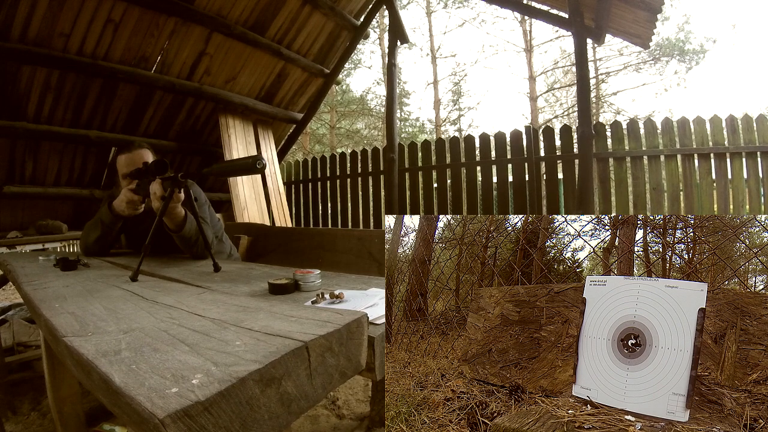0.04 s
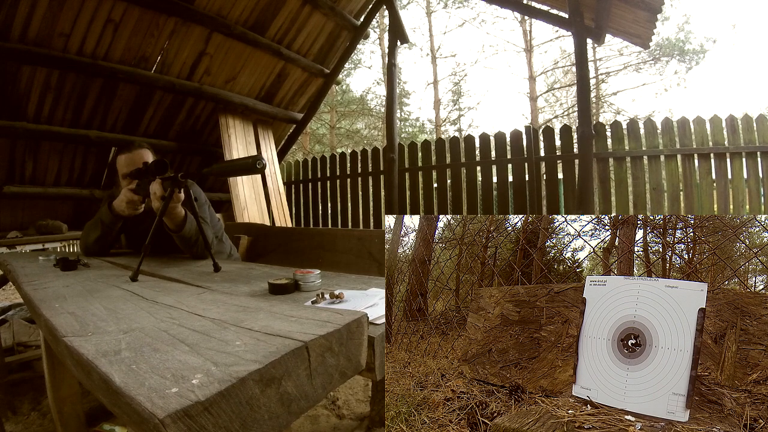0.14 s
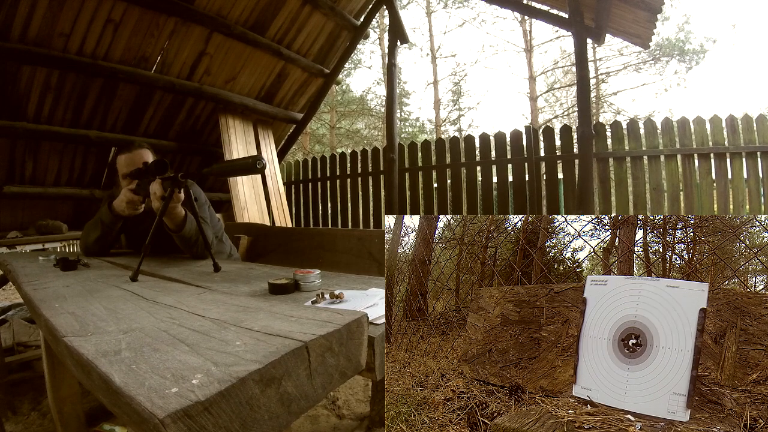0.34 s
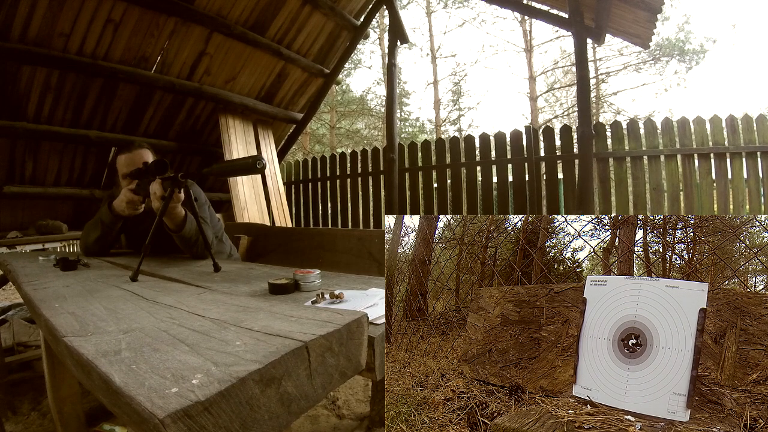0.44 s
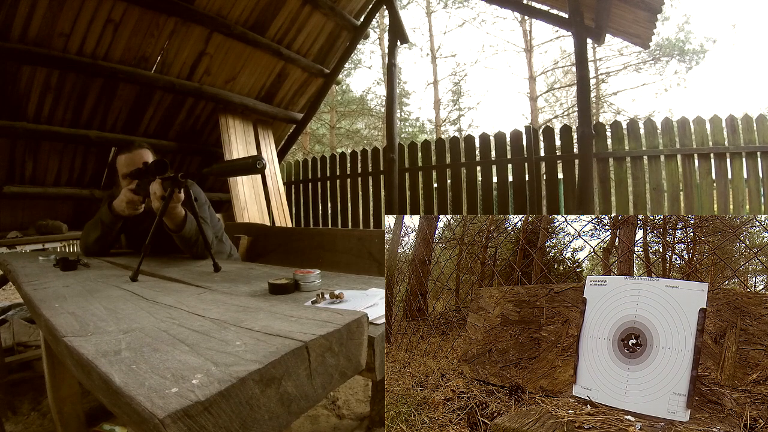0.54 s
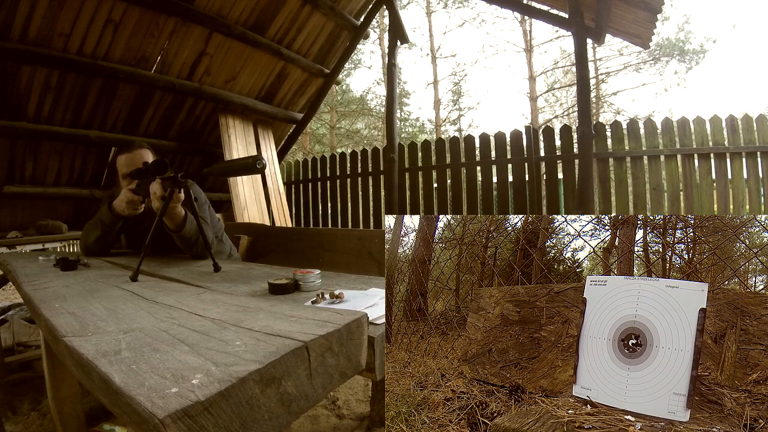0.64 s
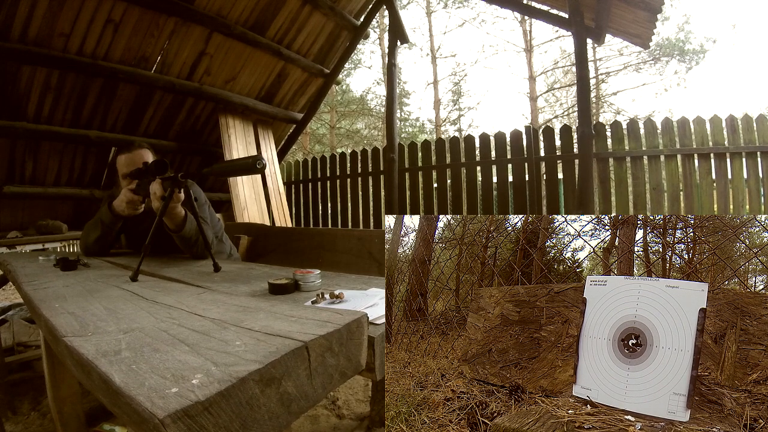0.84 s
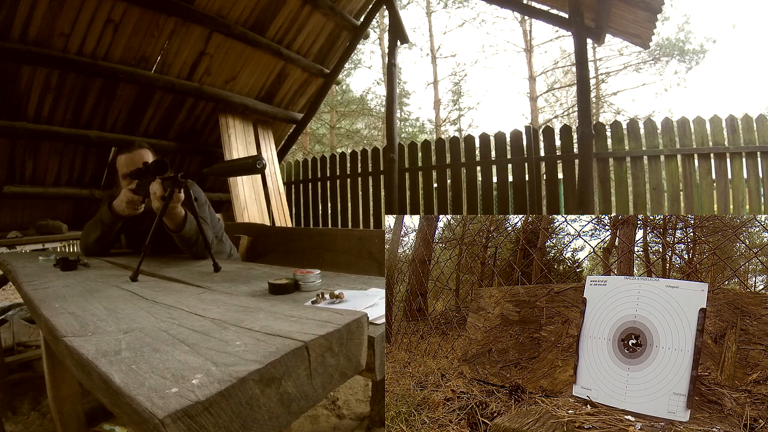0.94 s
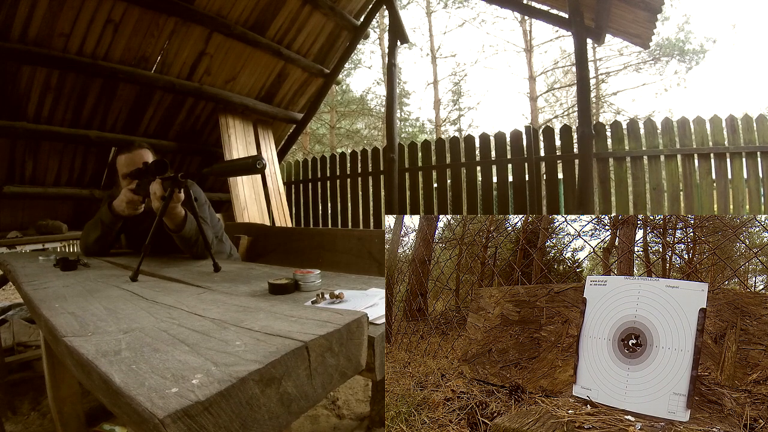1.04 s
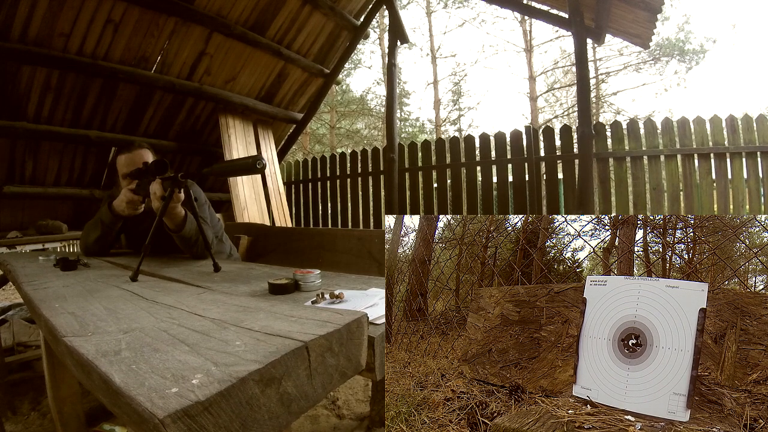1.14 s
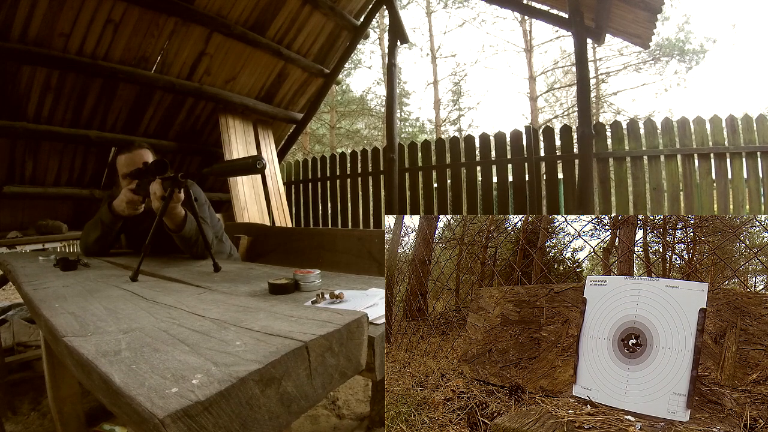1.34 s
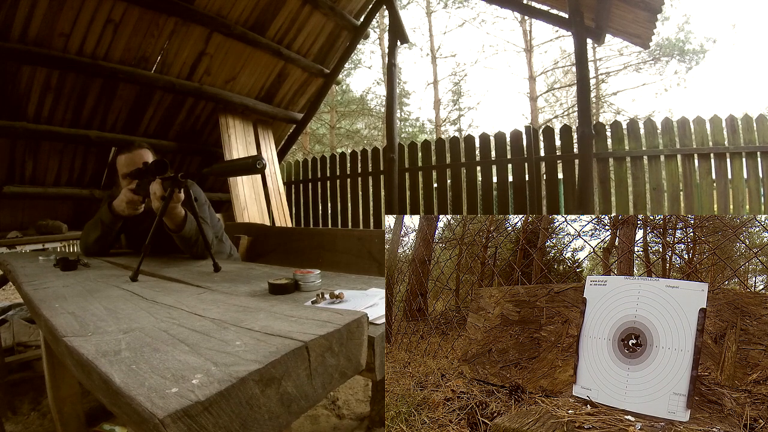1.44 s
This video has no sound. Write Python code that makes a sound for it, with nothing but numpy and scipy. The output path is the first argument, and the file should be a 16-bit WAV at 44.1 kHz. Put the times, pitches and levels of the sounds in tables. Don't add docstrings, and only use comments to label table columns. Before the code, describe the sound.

An air rifle fires one sharp crack, then its pellet clanks on a thin steel trap.

```python
import sys
import numpy as np
from scipy import signal
from scipy.fft import rfft, irfft
from scipy.io import wavfile
from scipy.ndimage import uniform_filter1d

SR = 44100
rng = np.random.default_rng(int(sys.argv[2]) if len(sys.argv) > 2 else 0)


def ratio(d):
    e = np.asarray(d, float) / 20
    return 10 ** e


def dump(signal):
    limited = np.clip(np.atleast_2d(signal).T, -1, 1)
    pcm = np.round(limited * 32767).astype(np.int16)
    wavfile.write(sys.argv[1], SR, pcm)


N = 66150

# (frequency [Hz], density [dB])
FOREST_AIR = [(12, -16), (30, 0), (110, -2), (200, -7), (500, -10.5), (2300, -16), (6500, -27),
              (15000, -43)]
FOREST_DB, PATCH_DB, SWELL_DB = -55, 1.0, .3
PUFFS_PER_S, PUFF_DB, PUFF_S, PUFF_SPREAD_DB = 60, -59, .0008, 3

# (frequency [Hz], density [dB])
TRIGGER = (.2283, .002, -46, .04, .04)
TRIGGER_AIR = [(880, -38), (1500, -10), (2220, -1), (3480, -8), (7000, -4), (10900, -8), (12800, -12),
               (13500, -63)]
JET = (.2443, .0007, -20, .04, .045)
JET_AIR = [(410, -47), (700, -16), (4100, -14), (5200, -8), (6650, -4), (7690, -13), (9480, -6),
           (13500, -14), (16000, -28)]
VALVE_S, VALVE_HZ, VALVE_DB, VALVE_T60_S = .2442, 14000, -12, .003
# (time [s], frequency [Hz], level [dB], swings [cycles])
PUSH = [(.2445, 410, -14, 1.35), (.24685, 485, -11, 1.0), (.24465, 1190, -21, 2.5), (.2471, 1050, -24, 1.2),
        (.2445, 110, -32, 1.1), (.2514, 440, -25, 1.1), (.2471, 260, -27, 1.0), (.24605, 12500, -21, 7),
        (.24703, 13500, -16, 3), (.2476, 12500, -18, 3), (.2611, 520, -32, .8)]

# (time [s], level [dB], strength of upper ring [ratio])
CRACKS = [(.24707, 1, .55), (.2477, -13, .8), (.2484, -11, 1.1), (.2495, -17, .5), (.24992, -8, .8),
          (.25068, -12, .8), (.2538, -11, .4), (.2549, -11, .9), (.2560, -17, .5), (.2577, -18, .1),
          (.2600, -26, .5), (.2630, -27, .9)]
# (frequency [Hz], level [dB], t60 [s])
HOUSING = [(6400, 0, .0042), (5300, -8, .004)]
UPPER_HOUSING = [(9600, -2, .0045), (11800, -7, .0025), (8200, -8, .004), (3000, -14, .004)]
UPPER_SPREAD = .1
BENCH = [(330, -43, .15), (548, -37, .11), (250, -33, .04)]
BARREL = [(5900, 0, 0.061), (6573, 0, 0.11), (8441, -5, 0.068), (9383, -6, 0.072), (10440, -4, 0.061),
          (11260, -1, 0.045), (11750, -13, 0.083), (13260, -15, 0.096)]
BARREL_DB = -31

SHELTER = (.250, .004, -31, .14, .14)
SHELTER_AIR = [(88, -43), (150, -13), (450, -4), (960, -16), (3920, -17), (5200, -11), (6510, -10),
               (13400, -18), (16000, -26)]
WHISTLE = (.252, .004, -34, .17, .17)
WHISTLE_LATE = (.28, .02, -47, .4, .4)
WHISTLE_AIR = [(5500, -40), (6200, -8), (6550, 0), (6900, -8), (7600, -40)]
RETURN = (.28, .025, -46, .4, .3)
RETURN_AIR = [(180, -32), (300, -2), (1280, -23), (1460, -15), (2700, -10), (3950, -16), (6620, -4),
              (13300, -21), (16000, -42)]
# (time [s], frequency [Hz], level [dB], t60 [s])
WALL_TICKS = [
    (.3075, 8500, -44, .006),
    (.3085, 6600, -42, .012),
    (.3280, 9600, -42, .008),
]

STRIKE = (.3318, .0012, -16.5, .045, .05)
STRIKE_AIR = [(59, -45), (200, -33), (970, -36), (1720, -20), (3470, -17), (4670, -7), (6800, -3),
              (9000, -5), (13500, -20), (16000, -36)]
SNAP = (.3318, .0003, -19, .015, .018)
SNAP_AIR = [(5000, -30), (7500, -5), (10300, 0), (12500, -2), (15000, -14)]
STRIKE_TAIL = (.334, .006, -29, .12, .09)
TAIL_AIR = [(700, -50), (1300, -14), (1800, -6), (3100, -3), (4600, 0), (7000, -3), (10500, -12),
            (15000, -26)]
KNOCK = (.332, .002, -43, .13, .13)
KNOCK_AIR = [(30, -15), (50, -2), (100, 0), (160, 0), (240, -14), (330, -20), (800, -60)]
# (frequency [Hz], level [dB], t60 [s])
STRIKE_TICK = [(5000, -4, .003)]
TRAP = [(2369, -16, .071), (3108, -12, .1), (3698, -14, .049), (3970, -6, .066), (4560, 2.5, .06),
        (5990, -2, .06), (6508, -12, .068), (6740, -10, .07), (7240, -11, .055), (8204, -7, .046),
        (8823, -16, .07), (8979, -13, .045), (9959, -15, .045), (11040, -20, .05),
        (4490, -9, .05), (4665, -11, .07), (4990, -6, .06), (6867, -6, .055), (2790, -13, .055),
             (4186, -14, .06), (3030, -15, .07), (7378, -9, .055), (5830, -9, .05), (5308, -15, .06),
             (6150, -11, .05), (2713, -18, .065), (8420, -10, .04)]
TRAP_WALLS = [(750, -27, .1), (1410, -18, .07), (1470, -21, .08), (1586, -8, .07), (1773, -11, .13),
              (1835, -10, .055), (2010, -19, .08), (1114, -40, .12), (920, -20, .022)]
TRAP_DB, TRAP_RISE_S, WALL_RISE_S, WALL_WOBBLE = -14, .001, .004, .1
# (time [s], frequency [Hz], level [dB], t60 [s])
BOUNCES = [
    (.3329, 6200, -9, .003),
    (.3335, 7000, -9, .004),
    (.3379, 4900, -6, .006),
    (.3430, 5200, -16, .004),
]

LATE = (.3938, .002, -37, .11, .11)
LATE_TAIL = (.40, .015, -46.5, .4, .19)
LATE_AIR = [(290, -46), (500, -22), (1200, -18), (1820, -9), (2230, -13), (2980, -1), (3340, -8),
            (8830, -5), (13600, -12), (16000, -33)]
LATE_TICK_S, LATE_TICK_DB = .3933, -33
# (time [s], frequency [Hz], level [dB], t60 [s])
LATE_GRAINS = [(.3955, 7000, -39, .008), (.3963, 8900, -36, .01), (.3995, 3050, -39, .016),
               (.3955, 5000, -36, .008), (.4060, 4700, -42, .01), (.4115, 8800, -43, .008),
               (.4340, 3000, -45, .012), (.4170, 755, -51, .12)]
# (frequency [Hz], level [dB], t60 [s])
TRAP_FAR = [(763, -1, .22), (1434, -1, .22), (1845, -1, .18), (2457, -2, .25), (3024, -1, .15),
            (3166, -2, .3), (4671, -2.5, .33), (6741, -5, .2), (7387, -2, .14), (8155, -1, .18)]
FAR_DB = -51

GUST = (.74, .07, -58, .9, .9)
GUST_AIR = [(70, -20), (170, 0), (350, -3), (800, -7), (1300, -22), (2500, -70)]
TWIG = (.8165, [(8200, -56, .012), (13200, -62, .012)])

# (time [s], level [dB])
DUCK = [(.24, -.3), (.26, -5), (.5, -6), (.56, -6.3), (.64, -3.6), (.72, -1.8), (.78, .3), (1.0, .2),
        (1.5, -.3)]
# (start [s], end [s])
FULL_BAND = [
    (.243, .25),
    (.331, .336),
    (.3925, .396),
]
EDGE_HZ, TAIL_EDGE_HZ, FOREST_EDGE_HZ, RUMBLE_HZ = 16650, 15300, 15000, 25
WOBBLE, GRAIN_DB = .28, 1.0


def evened(x):
    return x / np.sqrt(np.mean(x ** 2) + 1e-20)


def wander(count, size):
    smooth = uniform_filter1d(rng.standard_normal(count), size=size)
    return evened(uniform_filter1d(smooth, size=size))


def read(points, hz):
    f, value = np.transpose(points)
    return np.interp(np.log(hz + 1), np.log(f + 1), value)


def add(mix, s, sound):
    part = mix[round(s * SR):][:len(sound)]
    part += sound[:len(part)]


def rings(modes, length, rise=.0001, scatter=0, wobble=0):
    t = np.arange(0, length, 1 / SR)
    out = np.zeros(len(t))
    for hz, db, t60 in modes:
        sine = np.sin(2 * np.pi * (hz * t + scatter * rng.random()))
        out += ratio(db - 60 * t / t60) * sine * (1 + wobble * wander(len(t), 150))
    return out * np.minimum(t / rise, 1)


def swing(hz, db, swings):
    turns = np.arange(0, 3 * swings, hz / SR)
    fade = np.exp(-(turns / swings) ** 4) * np.minimum(turns / .15, 1)
    return -ratio(db) * np.sin(2 * np.pi * turns) * fade


def add_burst(mix, air, shape):
    start, rise, level_db, low_t60, high_t60 = shape
    t = np.arange(16384) / SR
    hz = np.fft.rfftfreq(len(t), 1 / SR)
    z = rfft(rng.standard_normal(len(t))) * ratio(read(air, hz)) * (hz < TAIL_EDGE_HZ)
    z /= np.sqrt(np.mean(irfft(z) ** 2))
    high = hz ** 2 / (hz ** 2 + 6000. ** 2)
    out = irfft(z * (1 - high)) * ratio(-60 * t / low_t60)
    out += irfft(z * high) * ratio(-60 * t / high_t60)
    grain = ratio(level_db + GRAIN_DB * wander(len(t), 30))
    add(mix, start, out * grain * np.minimum(t / rise, 1))


def forest_hush():
    frames, hz = N // 256 + 5, np.fft.rfftfreq(1024, 1 / SR)
    a, b, patches = rng.standard_normal((frames, 513, 3)).T
    patches = uniform_filter1d(patches, size=12, axis=0)
    patches = evened(uniform_filter1d(patches, size=10, axis=1))
    swell = evened(uniform_filter1d(rng.standard_normal(frames), size=12))
    level = read(FOREST_AIR, hz)[:, None] + PATCH_DB * patches + SWELL_DB * swell
    z = (a + 1j * b) * (hz < FOREST_EDGE_HZ)[:, None] * ratio(level)
    return ratio(FOREST_DB) * evened(signal.istft(z, nperseg=1024, noverlap=768)[1][:N])


def wind_puffs():
    level = PUFF_DB + PUFF_SPREAD_DB * np.minimum(rng.exponential(1, N), 4)
    hits = (rng.random(N) < PUFFS_PER_S / SR) * ratio(level)
    u = np.arange(-200, 200) / SR / PUFF_S
    puff = (1 - u ** 2 / 4) * np.exp(-u ** 2 / 2) * np.exp(-abs(u) / 2)
    puffs = -signal.oaconvolve(hits, puff, "same")
    return puffs - puffs.mean()


def trigger_and_valve():
    out = np.zeros(N)
    add_burst(out, TRIGGER_AIR, TRIGGER)
    add(out, VALVE_S, rings([(VALVE_HZ, VALVE_DB, VALVE_T60_S)], .02))
    add_burst(out, JET_AIR, JET)
    for s, *row in PUSH:
        add(out, s, swing(*row))
    return out


def crack():
    out = np.zeros(N)
    for s, db, share in CRACKS:
        loose = [(hz * (1 + UPPER_SPREAD * rng.uniform(-1, 1)), level, t60) for hz, level, t60 in UPPER_HOUSING]
        upper = rings(loose, .02, .0002, scatter=.3)
        add(out, s, -ratio(db) * (rings(HOUSING, .02) + share * upper))
    start = CRACKS[0][0]
    add(out, start, rings(BENCH, .2, .003, scatter=1, wobble=WOBBLE))
    add(out, start, ratio(BARREL_DB) * rings(BARREL, .15, .002, scatter=1, wobble=WOBBLE))
    return out


def shelter():
    out = np.zeros(N)
    add_burst(out, SHELTER_AIR, SHELTER)
    add_burst(out, WHISTLE_AIR, WHISTLE)
    add_burst(out, RETURN_AIR, RETURN)
    add_burst(out, WHISTLE_AIR, WHISTLE_LATE)
    for s, *mode in WALL_TICKS:
        add(out, s, rings([mode], .02, .0008, wobble=WOBBLE))
    return out


def trap():
    out = np.zeros(N)
    start = STRIKE[0]
    for air, shape in ((STRIKE_AIR, STRIKE), (SNAP_AIR, SNAP), (KNOCK_AIR, KNOCK), (TAIL_AIR, STRIKE_TAIL)):
        add_burst(out, air, shape)
    add(out, start, rings(STRIKE_TICK, .01))
    plates = rings(TRAP, .25, TRAP_RISE_S, scatter=1, wobble=WOBBLE)
    walls = rings(TRAP_WALLS, .25, WALL_RISE_S, scatter=1, wobble=WALL_WOBBLE)
    add(out, start, ratio(TRAP_DB) * (plates + walls))
    for s, *mode in BOUNCES:
        add(out, s, rings([mode], .06, .0003, wobble=WOBBLE))
    return out


def late_arrival():
    out = np.zeros(N)
    add(out, LATE_TICK_S, ratio(LATE_TICK_DB) * rings([(4500, 0, .001), (9500, -3, .001)], .01))
    add_burst(out, LATE_AIR, LATE)
    add_burst(out, LATE_AIR, LATE_TAIL)
    add(out, LATE[0], ratio(FAR_DB) * rings(TRAP_FAR, .3, .004, scatter=1, wobble=WOBBLE))
    for s, *mode in LATE_GRAINS:
        add(out, s, rings([mode], .06, .0003, wobble=WOBBLE))
    return out


def gust_and_twig():
    out = np.zeros(N)
    add_burst(out, GUST_AIR, GUST)
    add(out, TWIG[0], rings(TWIG[1], .02, .002, wobble=WOBBLE))
    return out


def scene():
    gain = ratio(np.interp(np.arange(N) / SR, *np.transpose(DUCK)))
    forest = gain * (forest_hush() + wind_puffs() + gust_and_twig())
    rifle = trigger_and_valve() + crack() + shelter()
    return (forest + rifle + trap() + late_arrival())[None]


def roll_off(x):
    return signal.sosfilt(signal.butter(12, 16830, fs=SR, output="sos"), x)


def band_limited(x, hz):
    return signal.oaconvolve(x, signal.firwin(511, hz, window=("kaiser", 9), fs=SR)[None], "same")


def record(dry):
    rumble_filter = signal.butter(1, RUMBLE_HZ, "high", fs=SR, output="sos")
    x = np.clip(signal.sosfilt(rumble_filter, dry), -1, 1)
    wide = band_limited(x, EDGE_HZ)
    narrow = band_limited(x, TAIL_EDGE_HZ + 300)
    t = np.arange(N) / SR
    loud = sum(1. * (t > start) * (t < end) for start, end in FULL_BAND)
    loud = uniform_filter1d(loud, size=60)
    return roll_off(narrow + loud * (wide - narrow))


dry = scene()
out = record(dry)
dump(out)
```